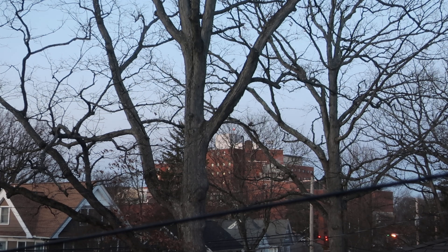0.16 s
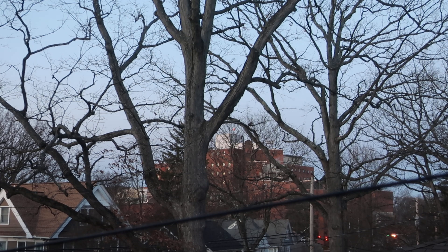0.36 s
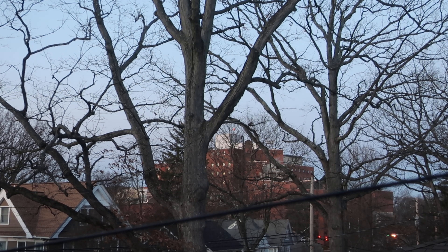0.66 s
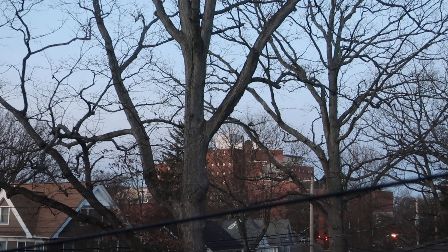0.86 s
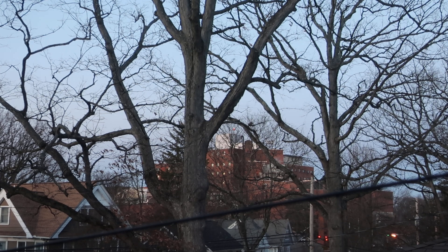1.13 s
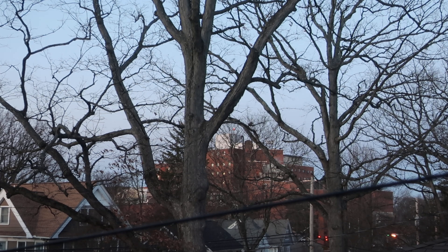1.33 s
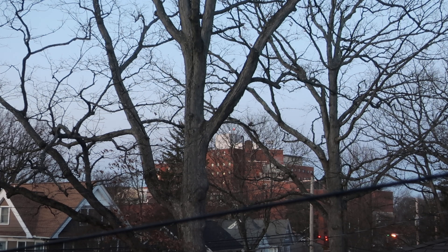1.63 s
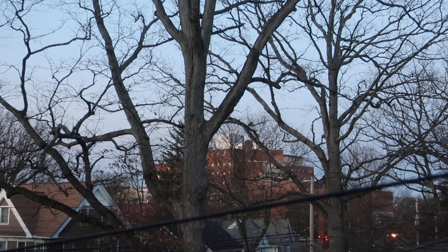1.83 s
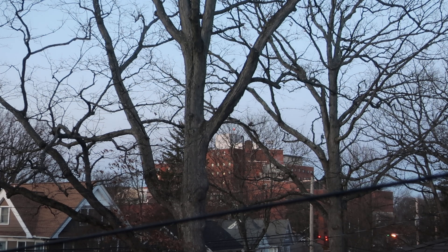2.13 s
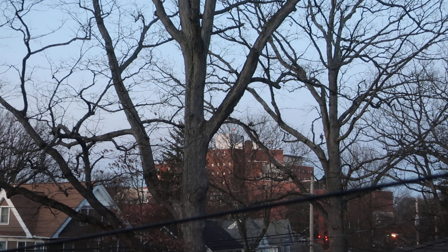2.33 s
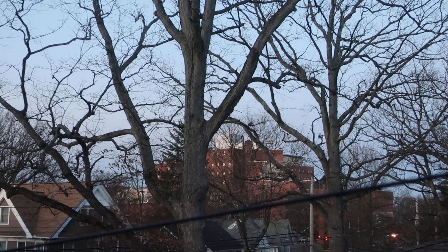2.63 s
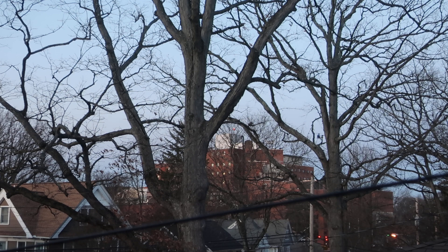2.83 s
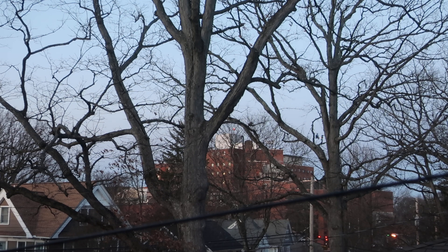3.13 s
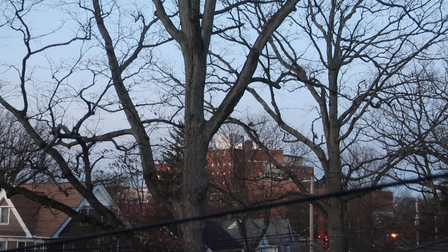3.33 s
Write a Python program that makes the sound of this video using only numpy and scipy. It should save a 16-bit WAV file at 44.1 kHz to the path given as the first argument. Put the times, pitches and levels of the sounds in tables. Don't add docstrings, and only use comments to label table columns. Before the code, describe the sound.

Outdoors among houses, a camera microphone picks up a helicopter's rapid thumping, sharpening from dull throb into hard slaps over a deep roar, with tiny camera ticks and a passing vehicle's soft rush last.

```python
import sys
import numpy as np
from scipy import signal
from scipy.fft import rfft, irfft
from scipy.io import wavfile
from scipy.ndimage import uniform_filter1d

SR = 44100
rng = np.random.default_rng(int(sys.argv[2]) if len(sys.argv) > 2 else 0)


def master_out(mix):
    frames = np.transpose(np.atleast_2d(mix))
    ceiling = np.clip(frames, -1, 1)
    pcm = np.round(ceiling * 32767).astype(np.int16)
    wavfile.write(sys.argv[1], SR, pcm)


def ratio(d):
    e = np.asarray(d, float) / 20
    return 10 ** e


N = 153027
TIME = np.arange(N) / SR
BLADE_RATE_HZ, PASS_JITTER_S = 27.863, .0022

# (time [s], thump [dB], slap [dB], knock [dB], crackle [dB], roar [dB])
FLIGHT = [
    (0, 1.5, -24, -32.5, -43.5, 1.5),
    (.45, 1, -12, -29.5, -40.5, 0.5),
    (.9, 2, -6.5, -26.5, -41, 1.5),
    (1.3, -2, -10, -32, -37.5, -1.5),
    (1.75, -3.5, -6.5, -36, -36, -4),
    (2.1, -5, -5.5, -40, -41.5, 0.5),
    (2.6, -3, -8, -42, -55.5, -2),
    (3.0, -0.7, -7.5, -39, -45.5, 1),
    (3.47, 0.3, -5.5, -45.5, -60, 2.5),
]
# (slap gain [dB], knock and crackle gain [dB])
BLADES = [(-7, -1.5), (-3.5, -3.85), (-4, -.5), (-4.64, 1)]


def evened(x):
    return x / np.sqrt(np.mean(x ** 2) + 1e-20)


def read(points, hz, tail_db=30):
    f, value = np.transpose(points)
    return np.interp(np.log(hz + 1), np.log(f + 1), value, right=value[-1] - tail_db)


def control(table, index):
    rows = np.transpose(table)
    return ratio(np.interp(TIME, rows[0], rows[index]))


def colour(x, points):
    hz = np.fft.rfftfreq(len(x), 1 / SR)
    return evened(irfft(rfft(x) * ratio(read(points, hz)), len(x)))


def wander(top_hz):
    rates_hz = np.geomspace(.3, top_hz, num=16)
    return evened(sum(np.sin(2 * np.pi * (f * TIME + rng.random())) / np.sqrt(f) for f in rates_hz))


def hump(t, rise_s, fall_s):
    return np.exp(-.5 * (t / np.where(t < 0, rise_s, fall_s)) ** 2)


def airy(points):
    patch_db = 0.57
    hz, t, z = signal.stft(rng.standard_normal(N), SR, nperseg=1024)
    patches = uniform_filter1d(rng.standard_normal(z.shape), size=8, axis=0)
    patches = evened(uniform_filter1d(patches, size=8, axis=1))
    noise = signal.istft(z * ratio(patch_db * patches), SR, nperseg=1024)[1][:N]
    return colour(noise, points)


def turns():
    start, doppler_rise, doppler_bend = .3192, .03848, -.03325
    return start + BLADE_RATE_HZ * TIME + doppler_rise * TIME ** 2 / 2 + doppler_bend * TIME ** 3 / 3


def ticks():
    # (time [s], level [dB])
    clicks = [
        (.084, -70),
        (.37, -69),
        (2.19, -73.5),
        (2.288, -66.5),
        (3.0, -75.5),
        (3.104, -68.5),
    ]
    out, t = np.zeros(N), np.arange(900) / SR
    for s, db in clicks:
        bright = np.diff(rng.standard_normal(len(t) + 2), n=2)
        out[round(s * SR):][:len(t)] += ratio(db - 60 * t / .025) * bright
    return out


def car():
    # (time [s], level [dB])
    approach = [
        (0, -48),
        (2.5, -47),
        (2.9, -42),
        (3.2, -40),
        (3.47, -38.5),
    ]
    # (frequency [Hz], density [dB per Hz])
    tyres = [(200, -9), (700, -4), (1300, 0), (2000, -7), (2900, -23), (3400, -26.5), (4500, -37),
             (8000, -59)]
    return control(approach, index=1) * airy(tyres)


def engine():
    # (frequency [Hz], density [dB per Hz])
    roar_spectrum = [(40, -17), (90, -9.5), (200, 1.5), (290, -1), (560, -1.5), (740, -9), (1200, -17.5),
                     (2000, -37.5)]
    # (frequency [Hz], density [dB per Hz])
    hiss_spectrum = [(1500, -2.5), (2200, -2.5), (2900, -4), (3300, -14.5), (4000, -25.5), (5500, -34.5),
                     (8000, -36), (14000, -60.5)]
    roar_db, roar_throb_db = -22.5, 2.5
    hiss_db, hiss_throb_db = -48, 3
    throb_fade_s = 2.6
    whine_hz, whine_wobble_hz, whine_db, whine_wander_db = 6591, 3, -77.5, 1.5
    motor_hz, motor_db = 13583, -99

    beat = np.cos(2 * np.pi * turns()) / (1 + (TIME / throb_fade_s) ** 4)
    roar = ratio(roar_db + roar_throb_db * beat) * airy(roar_spectrum)
    hiss = ratio(hiss_db + hiss_throb_db * beat) * airy(hiss_spectrum)
    whine = np.sin(2 * np.pi * np.cumsum(whine_hz + whine_wobble_hz * wander(8)) / SR)
    whine = ratio(whine_db + whine_wander_db * wander(20)) * whine
    motor = ratio(motor_db) * np.sin(2 * np.pi * motor_hz * TIME)
    return control(FLIGHT, index=5) * (roar + hiss) + whine + motor


def houses(x):
    t60_s, gap_s, spacing = 0.51, 0.0033, 22
    taps = np.zeros(SR // 2)
    count = (len(taps) - 1) // spacing
    places = np.arange(0, len(taps) - spacing, spacing) + rng.integers(0, spacing, count)
    taps[places] = rng.choice([-1., 1.], count)
    t = np.arange(len(taps)) / SR
    taps *= ratio(-60 * t / t60_s) * np.clip(t / gap_s - 1, 0, 1)
    return signal.fftconvolve(x, taps / np.linalg.norm(taps))[:N]


def thump():
    # (multiple of blade rate, level [dB])
    harmonics = [(1, -45), (2, -26.5), (3, -37), (4, -30), (5, -42), (6, -28.5), (7, -38.5), (8, -30.5),
                 (9, -39.5)]
    lead_turns, bend_turns, wander_db = .099, -.99, 0.52
    fade_start_s, fade_length_s, fade_depth_db = 2.95, 0.23, -7.5

    fade_db = fade_depth_db * np.clip((TIME - fade_start_s) / fade_length_s, 0, 1)
    passes = turns()
    tones = np.zeros(N)
    for k, db in harmonics:
        phase = k * passes + lead_turns * k + bend_turns / k
        level_db = db + wander_db * wander(5) + fade_db * (k > 5)
        tones += ratio(level_db) * np.cos(2 * np.pi * phase)
    return np.sqrt(2) * control(FLIGHT, index=1) * tones


def bursts():
    # (frequency [Hz], density [dB per Hz])
    knock = [(400, -40), (600, -3), (800, 4), (1050, -2.5), (1300, -20), (1700, -34)]
    # (frequency [Hz], density [dB per Hz])
    crackle = [(800, -18), (1200, 3), (1750, 3.5), (2050, -11), (2500, -11), (2950, -12.5), (3300, -28),
               (4500, -47)]
    # (time [s], level [dB])
    hard_knocks = [(.132, 7.5), (.204, 1.5), (.276, 5), (.383, -0.5), (.419, 1.5), (.563, 7.5), (.706, -1),
                   (.814, 0), (.85, 2), (.886, 4), (1.029, 2.5), (1.244, 8), (1.603, 3.5), (.311, 4),
                   (.168, 2.5), (2.251, 5)]
    # (time [s], level [dB])
    hard_crackles = [(.096, 2.5), (.276, 3.6), (.419, 3.7), (.993, 5.6), (1.101, 4), (1.137, 4), (1.209, 3),
                     (1.28, 5.6), (1.568, 1.9), (1.603, 2.1), (1.711, 5.6), (1.819, 3.6), (1.855, 3.3),
                     (1.891, 5), (1.927, 3), (1.963, 4.2)]
    rise_s, fall_s, spread_db = .0025, 0.0046, 3
    grains_per_s, grain_db = 9000, 1.2

    passes = turns()
    nearest = np.round(passes).astype(int)
    off_s = (passes - nearest) / BLADE_RATE_HZ
    out = np.zeros(N)
    for index, points, hard in ((3, knock, hard_knocks), (4, crackle, hard_crackles)):
        luck = np.clip(rng.standard_normal((nearest.max() + 1, 2)), -1.5, 1.5)
        blade = (np.arange(len(luck)) - 1) % 4
        size_db = np.array(BLADES)[blade, 1] + spread_db * luck[:, 1]
        for s, db in hard:
            size_db[nearest[round(s * SR)]] = db
        grain_gain = ratio(grain_db * np.minimum(rng.exponential(1, N), 3))
        struck = rng.random(N) < grains_per_s / SR
        grains = rng.standard_normal(N) * grain_gain * struck
        gate = hump(off_s - PASS_JITTER_S * luck[nearest, 0], rise_s, fall_s)
        out += control(FLIGHT, index=index) * colour(grains * gate * ratio(size_db[nearest]), points)
    return out


def slaps():
    # (time [s], peak level [dB], swing rate [Hz])
    hard_slaps = [(0.4172, -9, 621), (0.561, -11, 700), (0.8173, -5, 429), (0.8486, -4, 441),
                  (0.9591, -6, 440), (0.9929, -5, 411), (1.0271, -25, 560), (1.0994, -5, 402),
                  (1.2077, -5.5, 509), (1.2427, -3, 424), (1.2808, -6.9, 485.5), (1.3867, -3, 414),
                  (1.5318, -3.5, 413), (1.7063, -5.5, 438), (1.819, -3, 426), (1.9627, -3.5, 400),
                  (2.1061, -6, 438), (2.2865, -5, 541), (2.3907, -2.5, 390.6), (2.4288, -4, 471),
                  (2.539, -3.5, 402), (2.9782, -4, 383), (3.0076, -7, 390), (3.1168, -5, 377.5),
                  (3.1501, -4.5, 390), (3.193, -6, 394), (3.2611, -6.5, 420), (3.2936, -4.5, 397),
                  (3.3304, -11.5, 510), (3.4019, -6.5, 395)]
    hard_trim_db = -1.84
    swing_hz, hz_spread, sag_per_s = 560, 0.14, .09
    rise_s, fall_s, spread_db, stretch_per_s = 0.0016, 0.0018, 0.63, .18
    core_db, core_s, core_pitch, core_fade_db_per_s = -4, 0.0005, 1.78, 2.5
    wall_db, wall_s, wall_pitch = -11.5, .014, 1.25

    passes = np.flatnonzero(np.diff(np.floor(turns())))
    luck = np.clip(rng.standard_normal((len(passes), 4)), -1.5, 1.5)
    level = control(FLIGHT, index=2)
    hard = np.array(hard_slaps)
    span = np.arange(-700, 1800)
    t = span / SR
    out = np.zeros(N + 3 * len(span))
    for k, at in enumerate(passes):
        a, b, c, d = luck[k]
        pass_s = at / SR
        s = pass_s + PASS_JITTER_S * a
        hz = swing_hz * np.exp(hz_spread * b - sag_per_s * pass_s)
        gain = level[at] * ratio(BLADES[k % 4][0] + spread_db * c)
        near = np.argmin(abs(hard[:, 0] - pass_s))
        if abs(hard[near, 0] - pass_s) < .5 / BLADE_RATE_HZ:
            s, peak_db, hz = hard[near]
            gain = ratio(peak_db + hard_trim_db)
        slow = t / (1 + stretch_per_s * s)
        angle = 2 * np.pi * hz * t
        swings = hump(slow, rise_s, fall_s) * np.cos(angle + d)
        wall = hump(slow - wall_s - PASS_JITTER_S * c, fall_s, fall_s) * np.cos(wall_pitch * angle + 2 * a)
        core = hump(t, core_s, core_s) * np.cos(core_pitch * angle + d)
        core = ratio(core_db - core_fade_db_per_s * s) * core
        out[len(span) + round(s * SR) + span] += gain * (swings + ratio(wall_db) * wall + core)
    return out[len(span):][:N]


def scene():
    echo_db = -8
    blows = slaps() + bursts()
    helicopter = thump() + blows + ratio(echo_db) * houses(blows) + engine()
    mix = helicopter + car() + ticks()
    return np.array([mix, mix])


def top_cut(x):
    return signal.sosfilt(signal.butter(12, 15200, fs=SR, output="sos"), x)


def record(dry):
    # (frequency [Hz], left minus right [dB])
    port_balance = [(250, 0), (470, 1.03), (660, 1.3), (930, 4.5), (1310, 1.5), (1850, -.6), (2600, -1.3),
                    (4000, 2.3)]
    # (frequency [Hz], level [dB])
    port_stray = [(40, -64), (200, -35.5), (470, -30.5), (900, -13), (1500, -11.5), (2600, -12.5),
                  (4500, 1), (9000, 3.5)]
    limit = 0.99

    hz, t, z = signal.stft(dry[0], SR, nperseg=512)
    random_phase = np.exp(2j * np.pi * rng.random(z.shape))
    stray = ratio(read(port_stray, hz, tail_db=3))[:, None] * random_phase
    lean = np.tanh(read(port_balance, hz, tail_db=0) * np.log(10) / 40)[:, None]
    side = signal.istft(z * (lean + np.sqrt(2) * stray), SR, nperseg=512)[1][:N]
    ports = np.array([dry[0] + side, dry[0] - side])
    ports = ports * np.minimum((N - np.arange(N)) / 40, 1)
    limited = ports / (1 + (ports / limit) ** 4) ** .25
    return top_cut(limited)


dry = scene()
out = record(dry)
master_out(out)
```